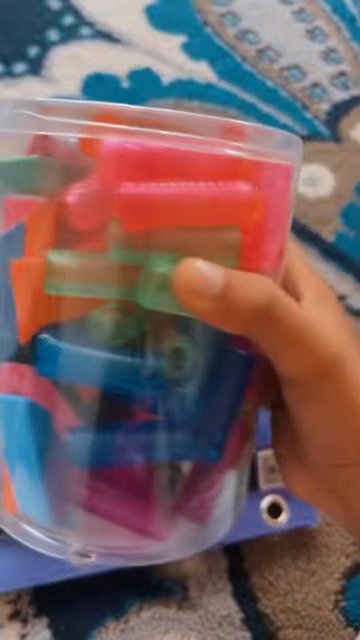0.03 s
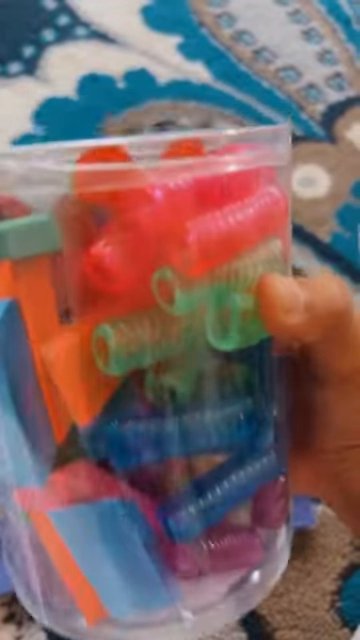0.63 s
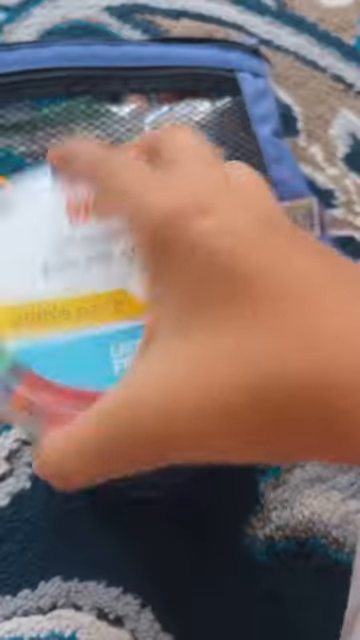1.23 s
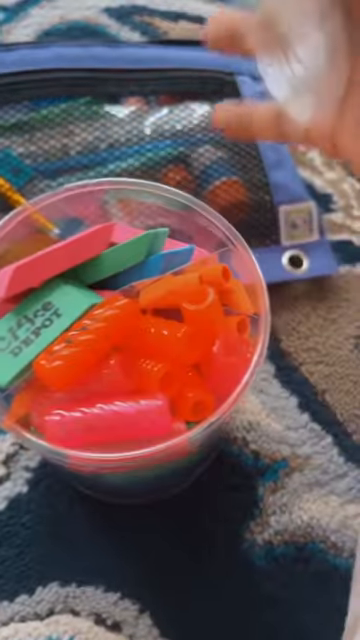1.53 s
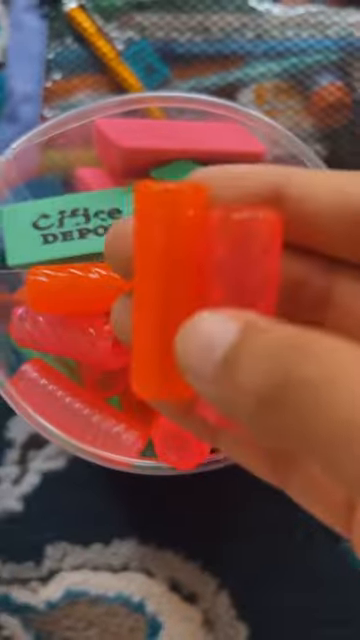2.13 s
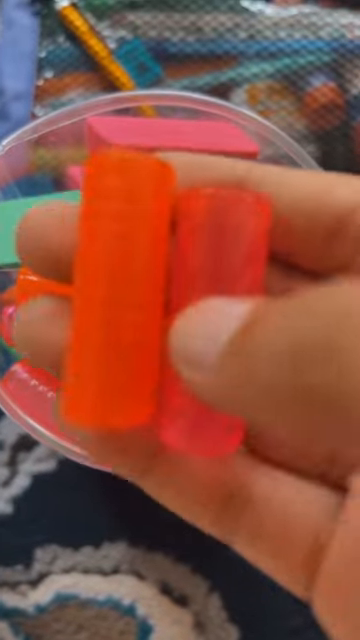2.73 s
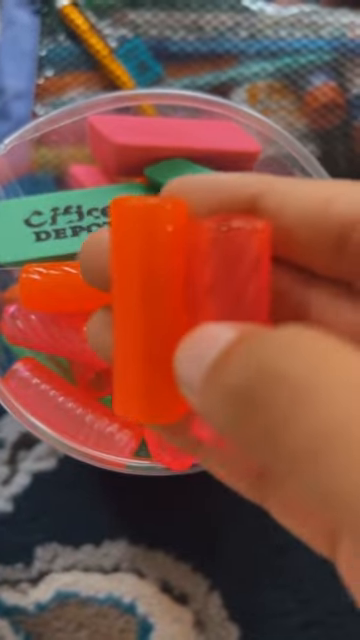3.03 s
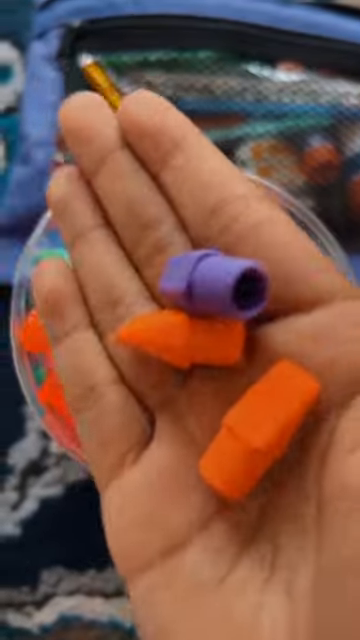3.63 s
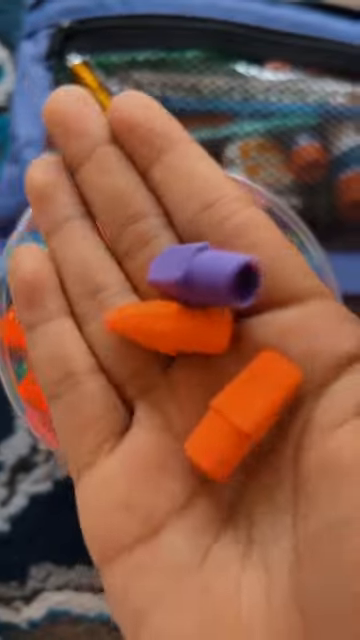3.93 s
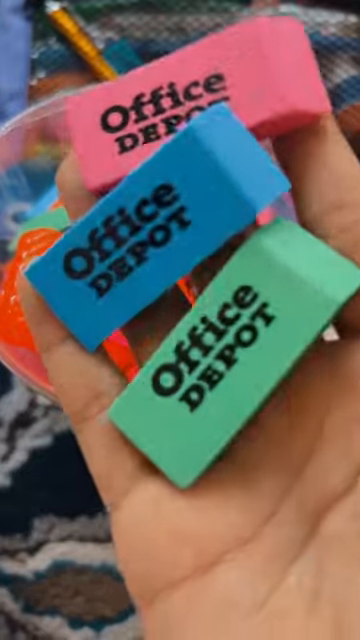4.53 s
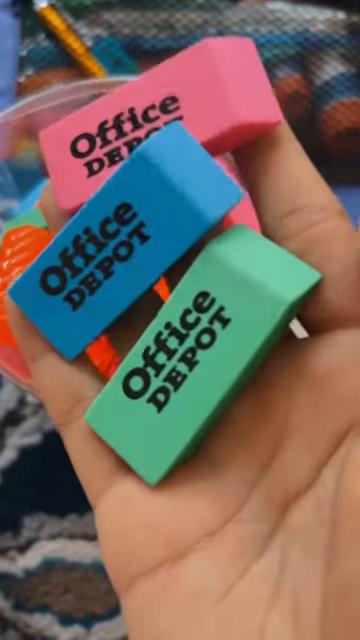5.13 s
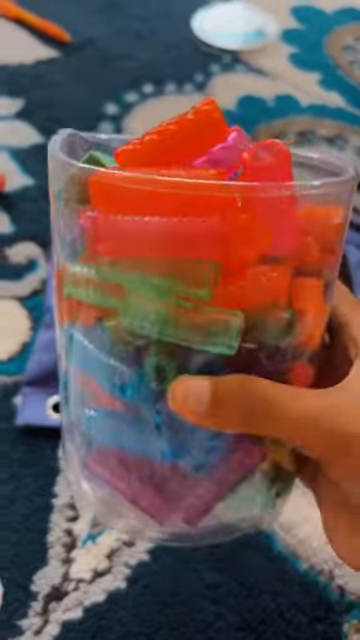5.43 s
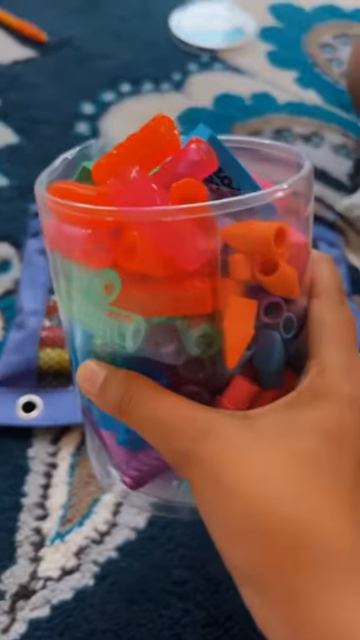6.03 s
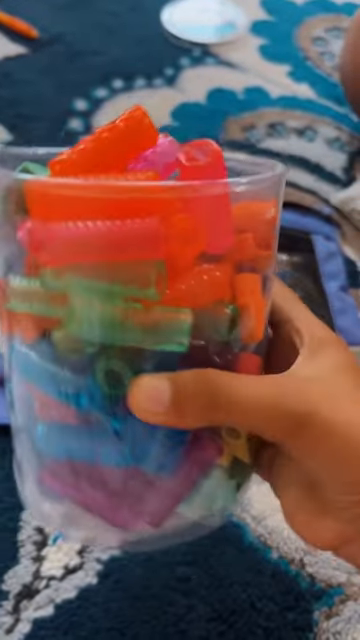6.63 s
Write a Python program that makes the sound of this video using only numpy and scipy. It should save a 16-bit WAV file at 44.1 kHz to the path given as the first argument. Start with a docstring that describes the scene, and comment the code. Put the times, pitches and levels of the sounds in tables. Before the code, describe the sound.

Close to a phone microphone in a quiet room, a plastic tub of erasers and pencil grips is handled with light ticks. Its lid comes off with a short scrape and a sharp hollow pop, and clatters down a moment later. After that come soft low thumps, fingertip taps on the phone and faint finger strokes. A faint hum and hiss run underneath, broken by five brief dropouts.

```python
"""A quiet room with a faint hum, where a plastic tub of erasers and pencil grips is handled near a phone.
The lid scrapes over the rim, snaps free with a hollow pop and clatters down to one side. Loose pieces
tick, fingers slide over plastic and rubber, and the hand bumps the phone. The scene runs in short
shots: a finger taps the screen, the sound drops out, then it fades in again."""
import sys
import numpy as np
from scipy import signal
from scipy.fft import rfft, irfft, next_fast_len
from scipy.io import wavfile
from scipy.ndimage import uniform_filter1d, minimum_filter1d, map_coordinates

SR = 44100
rng = np.random.default_rng(int(sys.argv[2]) if len(sys.argv) > 2 else 0)


def dump(signal):
    """Clip the signal to [-1, 1] and save it as 16-bit WAV at the path in sys.argv[1]."""
    limited = np.clip(np.atleast_2d(signal).T, -1, 1)
    pcm = np.round(limited * 32767).astype(np.int16)
    wavfile.write(sys.argv[1], SR, pcm)


N = 299439
TIME = np.arange(N) / SR
AGE = np.arange(SR // 2) / SR  # seconds since a hit

# Tone colours. Each row: frequency in Hz, relative spectral level in dB.
RIM_COLOUR = [(400, -15), (700, -3), (1100, -1.5), (1600, -4.5), (2100, 0), (2700, 1.5), (3200, -7.5),
              (3900, -9), (4700, -7.5), (5600, -6.5), (6800, -5), (8500, -12), (10500, -30), (15500, -33.5)]  # the lip scraping the rim
WALL_COLOUR = [(60, -7.5), (110, 0), (170, 7), (260, -6.5), (450, 0), (650, -8), (1000, -46)]  # the flexing tub wall
SLAP_COLOUR = [(350, -26.5), (600, 1), (746, -6), (953, -11), (1110, -13), (1510, -14), (1660, -21.5),
               (1930, -15.5), (2470, -23.5), (7850, -29), (15500, -46.5)]  # the lid's papery slap
PHONE_COLOUR = [(150, -22.5), (500, -4), (750, 1), (1150, 3), (1500, 3), (2400, 1), (3100, -5), (4000, -25),
                (6500, -14), (9000, -29.5), (12000, -24), (15500, -40.5)]  # the phone's body
RUMBLE_COLOUR = [(15, -40), (26, -12), (37, 1.5), (65, 1.5), (95, 0), (140, -5), (200, -7), (280, -12),
                 (450, -22), (900, -51)]  # the low end of the room tone
HISS_COLOUR = [(210, -24.5), (350, -1.5), (451, -2.5), (513, -2), (641, -4.5), (694, -2), (739, -5),
               (954, -4), (1230, -6.5), (1860, -5.5), (2640, -4.5), (4840, -14), (9290, -18), (12200, -19),
               (15700, -29.5)]  # its airy top
SCUFF_COLOUR = [(60, -13.5), (160, 6.5), (400, -19.5), (800, -30.5), (2000, -60)]  # a soft bump
RUB_ROLLOFF = [(7000, 0.5), (11000, -5), (15000, -8)]  # takes the edge off the finger strokes
# Modes of the rim and the air in the tub. Each row: pitch in Hz, level in dB, t60 and attack in seconds.
POP_MODES = [(384.6, -1.5, 0.03, 0.0028), (365.5, -28.5, 0.16, .003), (578, -27.5, 0.067, 0.0012),
             (645, -16, 0.021, 0.00068), (1130, -20, 0.016, 0.00039), (1165, -37.5, 0.079, 0.00093),
             (1450, -46.5, .1, .001), (2180, -17, 0.018, 0.0002), (2545, -13, 0.013, 0.00006),
             (2630, -32, 0.0065, 0.000084), (4870, -23, .007, 0.000071), (6440, -20.5, 0.0069, .0001),
             (7800, -31, 0.008, .0001)]
# The lid is gripped, brushes a pouch and lands.
# Each row: start in seconds, ring gain in dB, slap level in dB, damping (1 rings freely).
LID_CONTACTS = [(1.7366, -51, -58.5, 0.73), (1.747, -49.5, -54, 1.1), (1.789, -61, -70.5, 0.66),
                (1.9038, -34, -34, 1.2), (1.9198, -35, -42, 1.27), (1.9275, -37.5, -43, 1.3),
                (1.935, -42, -48, 1), (1.972, -51.5, -50.5, 0.8)]
# The lid's modes. Each row: pitch in Hz, relative level in dB, free-ringing t60 in seconds.
LID_MODES = [(100.2, -16, 0.4), (164.6, -8, 0.45), (254, 1, 0.089), (340, 4, 0.076), (424, -3, 0.088),
             (481.4, -0.5, 0.11), (538, -3.5, 0.11), (624, -7, 0.14), (800, -25, 0.059), (947, -18, 0.089),
             (1328, -29, 0.11), (1464, -21, 0.081), (2004, -18.5, 0.093)]
# Hand and lid thud on tub, floor and phone.
# Each row: start in seconds, level in dB, pitch in Hz, second contact in dB relative to the first.
SOFT_BUMPS = [(1.162, -28, 260, -2.5), (1.593, -44.5, 113, -3), (1.754, -36, 181, -15),
              (1.939, -33, 108, -2), (2.95, -36, 174, -7), (2.964, -27, 135, -9), (2.99, -24.5, 93.2, -3),
              (3.089, -31, 90.5, -3.5), (3.467, -34, 93.7, 2.5), (3.576, -34.5, 107.4, -2.5),
              (3.819, -46, 81.6, -2), (4.51, -46, 63, 1), (4.924, -43, 110, 6.5), (6.228, -46.5, 293, -16)]
# Sharp ticks: loose plastic pieces knocking, and the bright click of a fingertip on the screen at 5.664 s.
# Each row: start in seconds, level in dB, pitch and width in Hz, t60 of the contact in seconds.
SHARP_TICKS = [(0.118, -42, 2540, 333, 0.0031), (0.4234, -53, 2020, 1390, 0.0065),
               (.458, -50.5, 1860, 2190, 0.014), (0.4866, -52.5, 2100, 1100, .008),
               (0.6883, -56, 1470, 1500, 0.013), (0.9431, -51, 1700, 2170, 0.01),
               (1.2033, -46, 2220, 1400, .008), (1.48, -58.5, 5200, 2500, 0.02),
               (1.6835, -45, 6740, 5970, 0.018), (2.906, -50.5, 2560, 900, 0.009),
               (2.9072, -55, 6860, 7000, 0.0083), (5.664, -59, 4900, 5000, 0.0029),
               (6.2269, -52.5, 1910, 600, 0.025), (6.24, -58, 2050, 600, .07)]
# Loose pieces patter. Each row: start and length in seconds, typical tick level in dB and pitch in Hz.
PIECE_RATTLES = [(.43, .055, -59, 2080), (0.874, .09, -59.5, 1830), (1.592, .02, -61, 7500),
                 (1.655, .055, -62.5, 8100), (2.807, .03, -64, 7800), (2.81, .075, -63.5, 2290)]
# A fingertip on the screen. Each row: time in seconds, tap level in dB, skin rub level in dB.
SCREEN_TAPS = [(1.05, -50, -58), (1.885, -55, -80.5), (3.074, -60, -67), (3.1416, -52, -62.5),
               (4.083, -58.5, -78), (4.1615, -49, -58), (5.1555, -61, -76), (5.264, -51, -59),
               (5.5845, -57.5, -82), (5.664, -52.5, -73)]
# Finger strokes. Each row: peak time in seconds, level in dB, swell time in seconds, centre in Hz.
FINGER_RUBS = [(0.074, -63, 0.054, 8900), (.205, -69.5, 0.062, 2500), (0.453, -69, 0.13, 2380),
               (0.947, -67, 0.086, 2050), (4.821, -70, 0.12, 7660), (5.608, -75, 0.12, 3000),
               (6.563, -73.5, 0.18, 7050)]
# Faint drones. Each row: peak time in seconds, level in dB, swell time in seconds, pitch and width in Hz.
DRONE_SWELLS = [(3.04, -66, 0.1, 403, 89.5), (3.778, -77, 0.16, 698, 40), (4.11, -75.5, .11, 3200, 79),
                (3.7, -76, 0.64, 2540, 900), (4.638, -79, 0.63, 2307, 118), (5.215, -66.5, 0.14, 328, 150)]
# Room tone, shot by shot. Each row: settled rumble level in dB, settled hiss level in dB.
SHOT_LEVELS = [(-59.5, -66), (-62.5, -68), (-63, -68.5), (-60.5, -68.5), (-61, -68.5), (-66, -69.5)]
# Electrical hum. Each row: pitch in Hz, rms level in dB.
HUM_PARTIALS = [(119, -65.5), (179, -78.5), (237, -85)]
# The room's decay. Each row: frequency in Hz, t60 in seconds.
ROOM_DECAY = [(150, 0.19), (2500, 0.42), (12000, 0.12)]
# Gaps between shots. Each row: stop and resume times in seconds.
SHOT_GAPS = [(1.072, 1.106), (2.006, 2.056), (3.172, 3.203), (4.208, 4.238), (5.307, 5.353)]

GRIP_S, POP_S = 1.161, 1.2402  # the fingers start to pull; the lip snaps free
SCRAPE_DB, SCRAPE_SWELL_DB_PER_S = -44, 251
SLIDE_DB, SLIDE_S, SLIDE_RELEASE_DB_PER_S = -51.5, 0.054, 483
WALL_DB, WALL_SWELL_DB_PER_S, WALL_RELEASE_DB_PER_S = -39, 192.5, 305
LIFT_DB, LIFT_S = -70, 0.22
SING_DB, SING_RELEASE_DB_PER_S, SING_HZ, SING_WIDTH_HZ = -59.5, 101, 2500, 430  # the rim after the snap
SECOND_CONTACT_S, BUMP_T60_AT_100_HZ_S = 0.04, 0.125
RATTLE_PER_S, RATTLE_T60_S, RATTLE_SCATTER_DB, RATTLE_SCATTER_OCTAVES = 70, 0.012, 2.5, 0.071
RUMBLE_START_DB, HISS_START_DB, SETTLE_S = -4.5, -2.5, 0.44  # each shot's room tone starts low
DRIFT_DB, DRIFT_PER_S = 0.5, 3  # the rumble wanders
LOW_CUT_HZ, TOP_HZ, CEILING_DB = 26, 15800, -20
GAP_DB, FADE_IN_S = -38, 0.083


def peel():
    """Scrape and wall shudder build with the pull; the freed lid slides off and the rim sings on."""
    before, after = np.maximum(POP_S - TIME, 0), np.maximum(TIME - POP_S, 0)
    gripped, free = TIME > GRIP_S, TIME > POP_S
    pull = amp(SCRAPE_DB - SCRAPE_SWELL_DB_PER_S * before)
    slide = amp(SLIDE_DB - SLIDE_RELEASE_DB_PER_S * np.maximum(after - SLIDE_S, 0))
    lift = amp(LIFT_DB) * swell(POP_S, LIFT_S)  # a faint rustle as the lid comes clear
    grit = coloured(friction(rate=1100, grain_db=1), RIM_COLOUR)
    scrape = np.where(free, np.hypot(slide, lift), pull) * grit
    rim_band = unit(band(rng.standard_normal(N), SING_HZ, SING_WIDTH_HZ))
    sing = amp(SING_DB - SING_RELEASE_DB_PER_S * after) * rim_band
    flex = amp(WALL_DB - WALL_SWELL_DB_PER_S * before - WALL_RELEASE_DB_PER_S * after)
    shudder = flex * coloured(rng.standard_normal(N), WALL_COLOUR)
    return gripped * (scrape + shudder) + free * sing


def pop():
    """The rim snaps free with a crack; the air in the tub takes a cycle to start ringing."""
    out = np.zeros(N)
    ring = sum(amp(db) * np.sin(2 * np.pi * hz * AGE) * decay(t60) * attack(rise)
               for hz, db, t60, rise in POP_MODES)
    crack = causal(rng.standard_normal(len(AGE)) * decay(0.014), RIM_COLOUR)
    add(out, POP_S, ring + amp(-32.5) * burst(crack))
    return out


def lid():
    """Each contact rings the lid a little differently, under a brief papery slap."""
    out = np.zeros(N)
    for start, ring_db, slap_db, damping in LID_CONTACTS:
        ring = np.zeros(len(AGE))
        for hz, db, t60 in LID_MODES:
            strength, detune = rng.standard_normal(2)
            phase = 2 * np.pi * hz * (1 + 0.025 * detune) * AGE + np.pi * detune
            ring += amp(db + 0.88 * strength) * np.sin(phase) * decay(t60 / damping)
        slap = coloured(rng.standard_normal(len(AGE)), SLAP_COLOUR) * decay(0.17)
        add(out, start, (amp(ring_db) * ring + amp(slap_db) * slap) * attack(0.0011))
    return out


def bumps():
    """The hand gives and lands again: two soft thuds, each a few low cycles with a dull scuff."""
    out = np.zeros(N)
    for first, db, hz, second_db in SOFT_BUMPS:
        envelope = decay(BUMP_T60_AT_100_HZ_S * 100 / hz) * attack(0.0047)  # higher thuds die sooner
        for start, level_db in ((first, db), (first + SECOND_CONTACT_S, db + second_db)):
            scuff = coloured(rng.standard_normal(len(AGE)), SCUFF_COLOUR)
            thud = np.sin(2 * np.pi * hz * AGE) + amp(-19) * scuff
            add(out, start, amp(level_db) * thud * envelope)
    return out


def tick(hz, width, t60):
    """A small hard contact rings one damped resonance."""
    contact = rng.standard_normal(len(AGE)) * decay(t60)
    return burst(band(contact, hz, width))


def ticks():
    """Sharp single contacts: loose pieces knocking, and the bright click of one screen tap."""
    out = np.zeros(N)
    for start, db, hz, width, t60 in SHARP_TICKS:
        add(out, start, amp(db) * tick(hz, width, t60))
    return out


def rattles():
    """Shifting pieces give a loose run of faint ticks, scattered in time, strength and pitch."""
    out = np.zeros(N)
    for start, length, db, hz in PIECE_RATTLES:
        for slot in np.arange(start, start + length, 1 / RATTLE_PER_S):
            softness, detune = rng.standard_normal(2)
            pitch = hz * 2 ** (RATTLE_SCATTER_OCTAVES * detune)
            sound = amp(db - RATTLE_SCATTER_DB * softness) * tick(pitch, 0.6 * pitch, RATTLE_T60_S)
            add(out, slot + rng.random() / RATTLE_PER_S, sound)
    return out


def taps():
    """A fingertip rubs briefly on the screen, then clicks through the phone's body."""
    out = np.zeros(N)
    impulse = 1.0 * (AGE == 0)
    click = burst(causal(impulse, PHONE_COLOUR))
    skin = coloured(friction(rate=1000, grain_db=3), PHONE_COLOUR)
    for start, db, rub_db in SCREEN_TAPS:
        add(out, start, amp(db) * click)
        out += amp(rub_db) * skin * swell(start - 0.006, 0.011)
    return out


def rubs():
    """Fingers slide over plastic and rubber in faint grainy strokes."""
    out = np.zeros(N)
    for peak, db, spread, hz in FINGER_RUBS:
        stroke = unit(resonate(friction(rate=210, grain_db=2), hz, width=3.1 * hz))
        out += amp(db) * stroke * swell(peak, spread)
    return filtered(out, lambda hz: amp(along(RUB_ROLLOFF, hz)))


def drones():
    """Narrow bands of noise swell and fade in the hiss."""
    out = np.zeros(N)
    for peak, db, spread, hz, width in DRONE_SWELLS:
        out += amp(db) * unit(band(rng.standard_normal(N), hz, width)) * swell(peak, spread)
    return out


def room_tone():
    """Low rumble and an even hiss creep up to their level in each shot."""
    starts = np.array([0] + [resume for stop, resume in SHOT_GAPS])
    shot = np.searchsorted(starts, TIME, side="right") - 1
    unsettled = np.exp(-(TIME - starts[shot]) / SETTLE_S)
    rumble_db, hiss_db = np.array(SHOT_LEVELS)[shot].T
    rumble_gain = amp(rumble_db + RUMBLE_START_DB * unsettled + DRIFT_DB * wobble(DRIFT_PER_S))
    rumble = rumble_gain * coloured(rng.standard_normal(N), RUMBLE_COLOUR)
    hiss = amp(hiss_db + HISS_START_DB * unsettled) * coloured(rng.standard_normal(N), HISS_COLOUR)
    return rumble + hiss


def hum():
    """An electrical hum, each partial wavering slightly in level and phase."""
    out = np.zeros(N)
    for hz, db in HUM_PARTIALS:
        gain = np.sqrt(2) * amp(db + 0.58 * wobble(4.58))
        out += gain * np.sin(2 * np.pi * hz * TIME + 0.62 * wobble(2.9))
    return out


def room(x):
    """The short tail of a carpeted room, lingering longest in the upper mids."""
    hz, t, spectrum = signal.stft(rng.standard_normal(SR // 2), SR, nperseg=256)
    fade = np.exp(-np.log(1000) * t / along(ROOM_DECAY, hz)[:, None])
    tail = signal.istft(spectrum * fade, SR, nperseg=256)[1]
    predelayed = np.pad(tail, (200, 0)) / np.linalg.norm(tail)
    return signal.fftconvolve(x, predelayed)[:N]


def amp(db):
    """Decibels to gain."""
    return 10 ** (np.asarray(db) / 20)


def unit(x):
    """Scale to rms 1."""
    return x / np.sqrt(np.mean(x ** 2) + 1e-20)


def burst(x):
    """Scale a click to the energy of 2 ms at rms 1."""
    return x / np.sqrt(np.sum(x ** 2) / (0.002 * SR))


def along(points, hz):
    """Read a curve of (Hz, value) points on a log frequency axis."""
    freqs, values = np.transpose(points)
    return np.interp(np.log(hz + 1), np.log(freqs + 1), values)


def wobble(rate):
    """A smooth random curve, rate knots a second."""
    return map_coordinates(rng.standard_normal(int(N * rate / SR) + 4), [TIME * rate])


def friction(rate, grain_db):
    """Noise broken into tiny slips of uneven strength."""
    return unit(rng.standard_normal(N) * amp(grain_db * wobble(rate)))


def filtered(x, response):
    """Shape x with a complex frequency response."""
    size = next_fast_len(len(x) + SR // 4)
    return irfft(rfft(x, size) * response(np.fft.rfftfreq(size, 1 / SR)), size)[:len(x)]


def coloured(x, colour):
    """Give x a tone colour, at rms 1."""
    return unit(filtered(x, lambda hz: amp(along(colour, hz))))


def causal(x, colour):
    """Minimum-phase EQ: colours a hit with no ringing ahead of it."""
    size = next_fast_len(len(x) + SR // 4)
    gain = amp(along(colour, np.fft.rfftfreq(size, 1 / SR)))
    cepstrum = irfft(np.log(gain), size)
    fold = 1 + np.sign(np.fft.fftfreq(size))
    return irfft(rfft(x, size) * np.exp(rfft(cepstrum * fold)), size)[:len(x)]


def resonate(x, hz, width):
    """One band-pass resonance, width in Hz."""
    return filtered(x, lambda f: 1j * f * width / (hz * hz - f * f + 1j * f * width))


def band(x, hz, width):
    """The same resonance twice, for a tighter band."""
    return resonate(resonate(x, hz, width), hz, width)


def attack(rise):
    """A soft onset with a time constant of rise seconds."""
    return 1 - np.exp(-AGE / rise)


def decay(t60):
    """An envelope that loses 60 dB in t60 seconds."""
    return np.exp(-np.log(1000) * AGE / t60)


def swell(peak, spread):
    """A bell-shaped envelope, down to 1/e at spread seconds either side of the peak."""
    return np.exp(-((TIME - peak) / spread) ** 2)


def add(track, start, sound):
    """Mix a sound into the track at start seconds."""
    part = track[round(start * SR):][:len(sound)]
    part += sound[:len(part)]


def limiter(x, ceiling_db, hold_samples):
    """The gain ducks when the half-millisecond level passes the ceiling; a brief crack slips through."""
    level = np.abs(uniform_filter1d(np.abs(x), size=24))
    gain = np.minimum(1, amp(ceiling_db) / (level + 1e-9))
    return x * uniform_filter1d(minimum_filter1d(gain, hold_samples), hold_samples // 2)


def scene():
    """The tub, ticks and rattles get a touch of room; rubs, bumps, taps and the background stay dry."""
    tub = peel() + pop() + lid()
    clicks = ticks() + rattles()
    reverb = room(amp(-25) * tub + amp(-13) * clicks)
    handling = rubs() + bumps() + taps()
    background = drones() + room_tone() + hum()
    return (tub + clicks + reverb + handling + background)[None]


def record(dry):
    """The phone trims deep bass and top, limits peaks, all but mutes between shots and fades back in."""
    low_cut = signal.butter(2, LOW_CUT_HZ, "highpass", fs=SR, output="sos")
    x = limiter(signal.sosfilt(low_cut, dry[0]), CEILING_DB, hold_samples=160)
    for stop, resume in SHOT_GAPS:
        fade_in = np.clip(0.077 + (TIME - resume) / FADE_IN_S, 0, 1)
        x = x * np.select([TIME < stop, TIME < resume], [1, amp(GAP_DB)], fade_in)
    return filtered(x, lambda hz: hz < TOP_HZ)[None]


dry = scene()
out = record(dry)
dump(out)
```